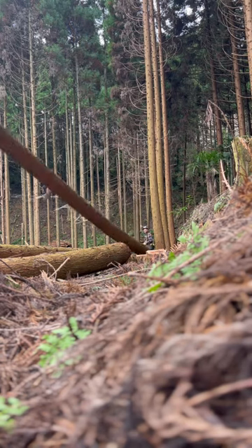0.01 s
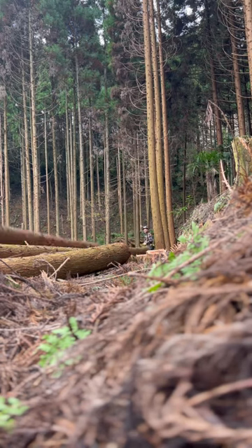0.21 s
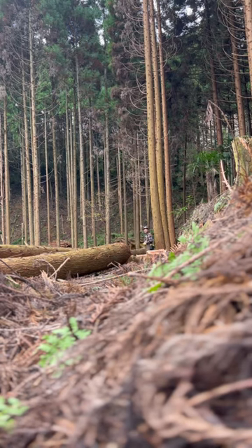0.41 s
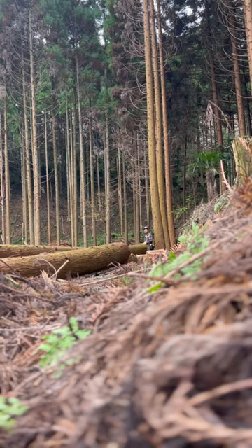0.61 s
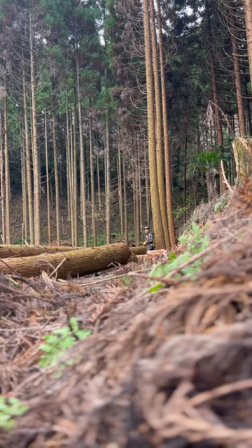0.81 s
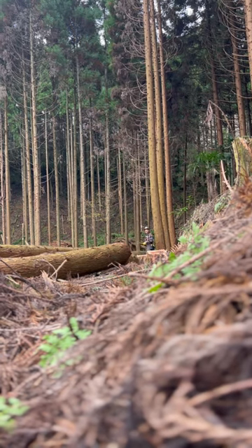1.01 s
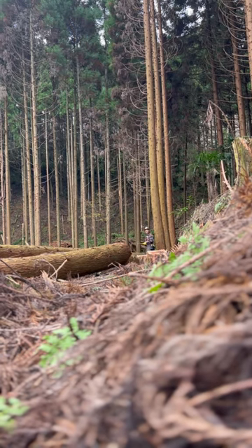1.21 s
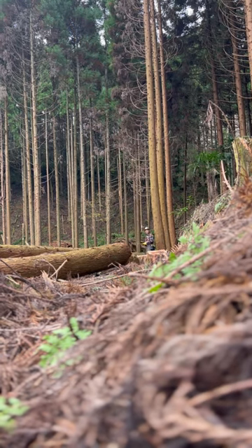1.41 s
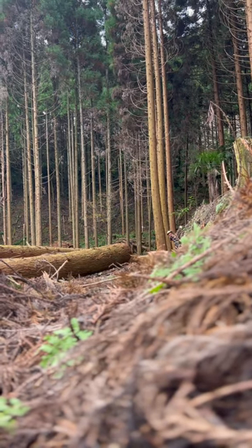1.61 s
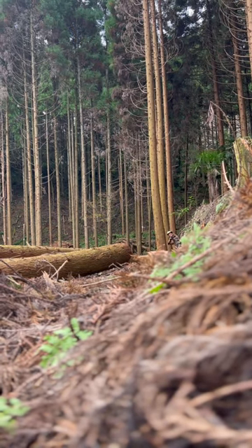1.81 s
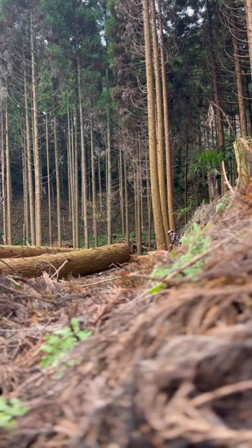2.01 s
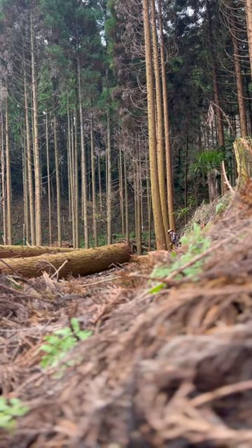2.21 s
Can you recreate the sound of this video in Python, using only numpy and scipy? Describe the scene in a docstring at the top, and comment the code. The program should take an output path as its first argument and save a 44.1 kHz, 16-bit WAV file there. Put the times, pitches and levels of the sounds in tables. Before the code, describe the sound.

Tree fall in a forest plantation: deep ground thump, crunching limbs, sharp snaps and needle hiss die away over an idling chainsaw and low engine drone; after a sudden cut, one woody knock rings near the end.

```python
"""A felled conifer slams into the forest floor: trunk thuds and ground rumble from rung modes and noise,
crunching limbs and snapping branches from resonated noise, hissing needles, crackling twigs, log knocks.
The scene changes abruptly to a quieter moment, where one hard blow on a felling wedge rings out as sagging
modes and the stand of trunks echoes it as noise. A chainsaw idles all along as filtered exhaust pulses,
over the low two-partial drone of a bigger engine and the noise of forest air."""
import sys
import numpy as np
from scipy import signal
from scipy.fft import rfft, irfft, next_fast_len
from scipy.io import wavfile
from scipy.ndimage import uniform_filter1d

SR = 44100
rng = np.random.default_rng(int(sys.argv[2]) if len(sys.argv) > 2 else 0)


def master(y):
    """Save y as 16-bit WAV."""
    cut = np.clip(np.atleast_2d(y).T, -1, 1)
    pcm = np.round(cut * 32767)  # scale
    wavfile.write(sys.argv[1], SR, pcm.astype(np.int16))


N = 101430


def amp(db):
    """Decibels to a linear gain."""
    return 10 ** (np.asarray(db) / 20)


def unit(x):
    """x brought to an rms of 1."""
    return x / np.sqrt(np.mean(x ** 2) + 1e-20)


def clock():
    """Time of each sample in seconds."""
    return np.arange(N) / SR


def along(points, hz):
    """Reads (Hz, value) points at the given frequencies on a log axis."""
    point_hz, values = np.transpose(points)
    return np.interp(np.log(hz + 1), np.log(point_hz + 1), values)


def curves(rows):
    """Automation lines: one value per sample for each column after the time."""
    times, *columns = np.transpose(rows)
    return [np.interp(clock(), times, column) for column in columns]


def fade(t, t60):
    """Exponential decay, down 60 dB after t60 seconds."""
    return np.exp(-np.log(1000) * t / t60)


def rise(t, rise_s):
    """Soft attack that approaches 1 exponentially."""
    return 1 - np.exp(-t / rise_s)


def filtered(x, response):
    """x times a response of frequency, padded against wrap-around."""
    size = next_fast_len(N + SR // 2)
    return irfft(rfft(x, size) * response(np.fft.rfftfreq(size, 1 / SR)), size)[..., :N]


def add(track, s, sound):
    """Mixes a short sound into the track at time s."""
    start = max(0, round(s * SR))
    part = track[..., start:start + sound.shape[-1]]
    part += sound[..., :part.shape[-1]]


def panned(pan_db):
    """Left and right gains; a positive pan leans left."""
    return amp(np.array([[pan_db], [-pan_db]]) / 2)


# left-right likeness of scattered sound: (frequency [Hz], coherence [0 to 1])
STEREO_LIKENESS = [(100, 1), (300, 0.99), (600, 0.48), (1500, 0.73), (4000, 0.53), (10000, 0.24)]


def spread(pair, colour):
    """Turns two unrelated signals into coloured stereo of rms 1, narrower where the ears hear alike."""
    def middle_and_side(hz):
        turn = np.arccos(np.clip(along(STEREO_LIKENESS, hz), -1, 1)) / 2
        return amp(along(colour, hz)) * [np.cos(turn), np.sin(turn)]

    mid, side = filtered(pair, middle_and_side)
    return unit(np.array([mid + side, mid - side]))


def noise(colour):
    """Coloured stereo noise of rms 1."""
    return spread(rng.standard_normal((2, N)), colour)


def steadied(x, window_s):
    """x with its slow swings of level evened out."""
    power = uniform_filter1d(np.mean(x ** 2, 0), max(2, int(window_s * SR)))
    return x / np.sqrt(np.abs(power) + 1e-4)


def ring(modes, t):
    """Sums damped sines from rows (Hz, dB, t60 s, rise s), each level varied at random by about 1 dB."""
    total = 0
    for hz, db, t60, rise_s in modes:
        gain = amp(db + rng.normal())
        total = total + gain * fade(t, t60) * rise(t, rise_s) * np.sin(2 * np.pi * hz * t)
    return total


# forest reverberation: (frequency [Hz], decay t60 [s])
FOREST_DECAY = [(100, 0.22), (500, 0.46), (2500, 0.13), (10000, 0.08)]


def forest(x, wet_db):
    """Adds scatter from trunks and ground: a noise tail whose decay depends on frequency."""
    hz, t, bins = signal.stft(rng.standard_normal((2, SR // 2)), SR, nperseg=256)
    decay = fade(t, along(FOREST_DECAY, hz)[:, None])
    tail = signal.istft(bins * decay, SR, nperseg=256)[1]
    scatter = signal.fftconvolve(x, tail / np.linalg.norm(tail[0]), axes=1)[:, :N]
    return x + amp(wet_db) * scatter


# trunk and heavy limbs hitting the ground: (time [s], level [dB], pitch [Hz])
THUD_HITS = [(.273, -0.5, 219), (.3, 2.5, 97.3), (.368, -2, 293), (.41, 1.5, 160), (0.426, 0.5, 215),
             (0.471, -10, 124), (.533, -11.5, 148), (0.713, -4.5, 79), (0.754, -13.5, 65),
             (0.833, -15.5, 65)]
THUD_T60_S = 0.057
# ground shaking under the trunk: (time [s], level [dB])
RUMBLE_LEVEL = [(.2, -41), (.262, -37), (.28, -7), (.315, -13), (.35, -12.5), (.38, -19), (.425, -10),
                (.445, -18), (.485, -18), (.51, -31), (.545, -28.5), (.6, -32), (.67, -35), (.72, -30),
                (.78, -28.5), (.86, -32.5), (.95, -40), (1.2, -74)]
# colour of the shaking ground: (frequency [Hz], relative level [dB per Hz])
RUMBLE_COLOUR = [(20, -36), (40, -8.5), (60, -6.5), (90, 3), (150, 1), (210, -8), (300, -11.5),
                 (600, -46.5), (1500, -86)]
# limbs crushed under the trunk: (time [s], level [dB])
CRUNCH_LEVEL = [(.15, -47.5), (.25, -26), (.278, -17), (.3, -12.5), (.325, -23.5), (.37, -13),
                (.432, -11.5), (.45, -22.5), (.485, -29.5), (.51, -44.5), (.545, -29), (.57, -44.5),
                (.66, -38.5), (.685, -35), (.8, -39), (1.25, -41.5), (1.5, -46)]
# colour of the crushed limbs: (frequency [Hz], relative level [dB per Hz])
CRUNCH_COLOUR = [(100, -32), (200, -4.5), (300, -0.5), (450, 0), (580, -9), (780, -14.5), (1000, -26.5),
                 (2000, -30.5), (5000, -77)]


def trunk(crunch_pan_db=2.0, crunch_lag_s=0.00028):
    """The trunk thuds and bounces as short damped tones, shakes the ground and crushes its limbs."""
    thuds, t = np.zeros(N), np.arange(SR // 4) / SR
    for s, db, hz in THUD_HITS:
        add(thuds, s, ring([(hz, db, THUD_T60_S, .002)], t))
    rumble = steadied(noise(RUMBLE_COLOUR), window_s=0.036) * amp(curves(RUMBLE_LEVEL)[0])
    crunch = steadied(noise(CRUNCH_COLOUR), window_s=0.034) * amp(curves(CRUNCH_LEVEL)[0])
    # the right ear hears the crunch a touch later
    crunch[1] = np.interp(clock() - crunch_lag_s, clock(), crunch[1])
    return thuds + rumble + crunch * panned(crunch_pan_db)


# breaking branches, before the trims below:
# (time [s], stick level [dB], pitch [Hz], splinter level [dB], decay t60 [s])
BRANCH_BREAKS = [(0.1677, -19, 2610, -27, 0.013), (0.191, -15.5, 1860, -22.5, .024),
                 (0.2064, -4.5, 3060, -33, 0.015), (0.21, -9.5, 6700, -24, .01),
                 (0.2483, -7, 2070, -21, .018), (0.2527, -18, 6000, -18, 0.015),
                 (0.2553, -2, 2180, -15.5, 0.011), (0.259, -7.5, 1900, -23, 0.023),
                 (0.2708, -4.5, 3150, -38, 0.023), (0.298, -14, 3150, -29, .02),
                 (0.3213, -10, 7600, -22, 0.015), (0.3476, -5.5, 1556, -20, 0.017),
                 (0.3749, -7, 3220, -32, .009), (0.4499, -0.5, 3930, -28, 0.011),
                 (0.4642, -9.5, 3240, -31, 0.012), (0.477, -12, 3000, -25.5, 0.0086),
                 (0.535, -16.5, 1575, -49, 0.035), (0.5651, -6, 3060, -31, 0.0084),
                 (0.6706, -20.5, 2220, -53, 0.017), (0.685, -22.5, 1690, -29, 0.024),
                 (0.9038, -9.5, 1820, -50, 0.026), (0.9894, -15, 4350, -30.5, 0.015),
                 (1.042, -24.5, 1710, -50, 0.04), (1.0796, -27.5, 1630, -47, .028),
                 (1.13, -27, 1500, -47, 0.035), (1.1895, -25.5, 1780, -60, 0.02),
                 (1.3087, -25.5, 3100, -45, 0.035), (1.3228, -8, 1930, -47, .008),
                 (1.346, -21, 1830, -41.5, .025), (1.471, -25, 1940, -39, 0.016)]
STICK_TRIM_DB, SPLINTER_TRIM_DB = -3.5, 4
OVERTONE_DB = -2.5  # against the stick's main pitch, at most
STICK_Q = 3.12  # at the typical decay


def stick_mode(tear, hz, q):
    """One resonance of the stick: tearing noise through two equal peaks, its level steadied."""
    peak = signal.iirpeak(min(hz, SR / 4), q, fs=SR)
    once = signal.lfilter(*peak, np.tile(tear, 2))
    twice = unit(signal.lfilter(*peak, once))
    # the first pass through the noise only gets the resonance going
    return steadied(twice[:, tear.shape[-1]:], window_s=0.0026)


def snaps(rise_s=0.00062, typical_t60_s=0.022, overtone=1.59, dull_hz=2600, pan_db=3, lag_s=.00015):
    """Each branch tears in a burst that rings the stick, with a bright splinter on top."""
    out, t = np.zeros((2, N)), np.arange(SR // 16) / SR
    bright = signal.butter(3, [5000, 9500], "band", fs=SR, output="sos")
    for s, db, hz, splinter_db, t60 in BRANCH_BREAKS:
        tear, chips = rng.standard_normal((2, 1, len(t)))
        q = max(1, STICK_Q * np.sqrt(t60 / typical_t60_s))  # the shorter the break, the broader its click
        overtone_gain = amp(OVERTONE_DB) * min(1, (dull_hz / hz) ** 2)  # weaker on high sticks
        stick = unit(stick_mode(tear, hz, q) + overtone_gain * stick_mode(tear, hz * overtone, q))
        body = amp(db + STICK_TRIM_DB) * stick * rise(t, rise_s)
        splinter = amp(splinter_db + SPLINTER_TRIM_DB) * unit(signal.sosfilt(bright, chips))
        left, right = (body * panned(pan_db) + splinter) * fade(t, t60)
        add(out[0], s, left)
        add(out[1], s + lag_s * rng.random(), right)
    return forest(out, wet_db=-10.5)


def crackle(per_s, pitch_hz, octaves, spread_db, cycles):
    """Stereo rain of tiny damped breaks, rms 1, each from its own direction."""
    count = int(per_s * N / SR)
    when, size, side, lag, tone = rng.random((count, 5)).T
    scatter = np.log((tone + 1e-9) / (1 - tone)) / 2  # bell-shaped, so most breaks sit near the pitch
    hz = np.clip(pitch_hz * 2 ** (octaves * scatter), 600, 13000)[:, None]
    t = np.arange(SR // 100) / SR
    # many small breaks, few big ones; the root offsets the shorter ring of high ones
    gain = amp(-spread_db * np.log(size + 0.022))[:, None] * np.sqrt(hz)
    grains = gain * np.sin(2 * np.pi * hz * t) * fade(t, cycles / hz)
    at = (when * N).astype(int)[:, None] + np.arange(len(t))
    at_right = at + (lag * 20).astype(int)[:, None]  # up to 19 samples later
    ears = []
    for places, share in [(at, side), (at_right, 1 - side)]:
        weighted = grains * np.sqrt(share)[:, None]
        ears.append(np.bincount(places.ravel(), weighted.ravel(), N)[:N])
    return unit(np.array(ears))


# crown brushing through air and brush: (time [s], level [dB])
SWISH_LEVEL = [(0, -41.5), (.16, -39), (.225, -31), (.243, -34), (.254, -19.5), (.268, -29), (.3, -21.5),
               (.355, -23.5), (.385, -27), (.44, -31), (.52, -38), (.6, -42.5), (.69, -39.5), (.88, -41),
               (1.05, -46), (1.27, -48), (1.33, -41), (1.39, -46.5), (1.5, -41)]
# hiss of the needles: (frequency [Hz], relative level [dB per Hz])
NEEDLE_COLOUR = [(200, -53), (600, 4.5), (1000, -7), (1800, -5.5), (3200, 1), (4800, -5.5), (7500, -2),
                 (10000, -9), (12500, -13.5), (16000, -31)]
NEEDLE_DB = 1
# small twigs, then thicker sticks: (rate [breaks per s], pitch [Hz], pitch spread [octaves],
# size spread [dB], ring [cycles], level [dB])
TWIGS_AND_STICKS = [(905, 4460, 0.59, 5.5, 4.1, -4), (264, 1980, 0.62, 4, 15, -5)]
DULL_FROM_S, DULL_DB_PER_S = 0.25, 13.5  # the treble fades as the crown comes to rest


def crown(treble_hz=6000, pan_db=4.0):
    """Needles hiss as noise, twigs and sticks crackle as grains, duller as they come to rest."""
    rustle = amp(NEEDLE_DB) * noise(NEEDLE_COLOUR)
    for *kind, db in TWIGS_AND_STICKS:
        rustle = rustle + amp(db) * crackle(*kind)
    treble = filtered(rustle, lambda hz: hz ** 2 / (hz ** 2 + treble_hz ** 2))
    dulling = amp(-DULL_DB_PER_S * np.maximum(clock() - DULL_FROM_S, 0))
    rustle = (rustle - treble) * panned(pan_db) + treble * dulling
    return rustle * amp(curves(SWISH_LEVEL)[0])


# logs knocking together as they settle: (time [s], level [dB])
LOG_KNOCKS = [(.672, -29), (1.221, -34.5), (1.322, -24.5), (1.343, -20), (1.372, -29)]
# modes of the log: (frequency [Hz], level [dB], decay t60 [s])
LOG_MODES = [(336, -8, 0.081), (453.4, -0.5, 0.17), (482, -4.5, 0.12), (543, -10.5, .07),
             (640, -11.5, 0.051), (770, -21, 0.025)]


def knocks(pan_db=2):
    """The log rolls against its neighbour with a hollow clunk of damped modes."""
    out, t = np.zeros((2, N)), np.arange(SR // 4) / SR
    for s, db in LOG_KNOCKS:
        clunk = ring([(*mode, .001) for mode in LOG_MODES], t)
        add(out, s, amp(db) * clunk * panned(pan_db))
    return forest(out, wet_db=-16.5)


BLOW_S, MODES_DB = 1.986, -17  # moment of the blow; trim of the modes below
# modes of wedge and stem, before the trim: (frequency [Hz], level [dB], decay t60 [s], delay [s])
WEDGE_MODES = [(80.8, -1.5, 0.25, 0.022), (132, -2.5, 0.12, 0.0061), (330, -6, 0.063, 0.0047),
               (383, -7, 0.079, .04), (450, -13, 0.09, .024), (626, -7, 0.098, 0.00593),
               (1230, -1, 0.045, 0.014), (1392, -5, 0.066, 0.00302), (1780, 2, 0.037, 0.00206),
               (2230, -9.5, 0.046, 0.002), (4900, -17, 0.027, 0.00102)]
# each mode starts sharp (as a fraction of its pitch) and sags to its pitch
WEDGE_RISE_S, WEDGE_SHARP, WEDGE_SETTLE_S = 0.0036, 0.064, 0.013
# crack of the blow: (frequency [Hz], relative level [dB per Hz])
CRACK_COLOUR = [(300, -15), (1500, 5.5), (4000, 2.5), (7200, -1.5), (9000, -26), (11500, -25),
                (13000, -64.5)]
CRACK_DB, CRACK_T60_S = -17, 0.035
# woody body of the blow: (frequency [Hz], relative level [dB per Hz])
STEM_COLOUR = [(250, 3.5), (650, -1.5), (900, -5.5), (1300, 12), (1800, 0), (2300, -16), (4000, -49.5)]
STEM_DB, STEM_T60_S = -19, 0.096
# echo from the stand of trunks: (time after the blow [s], level [dB])
ECHO_LEVEL = [(0, -65), (.012, -36), (.04, -43.5), (.075, -37), (.115, -37), (.16, -41.5), (.22, -51),
              (.31, -49.5)]
# colour of the echo: (frequency [Hz], relative level [dB per Hz])
ECHO_TONE = [(300, -11), (650, -3.5), (950, -11.5), (1400, -1.5), (2400, 0.5), (3600, -8), (6300, -10.5),
             (8500, -22.5), (13000, -49)]


def wedge(pan_db=2, crack_rise_s=0.0017, stem_rise_s=0.0049):
    """A crack, the sagging ring of wedge and stem, each mode after its own delay, and the trees' echo."""
    out, modes, t = np.zeros((2, N)), np.zeros(N), clock()
    # time runs fast at first, which lifts the pitch
    sagging = t + WEDGE_SHARP * WEDGE_SETTLE_S * rise(t, WEDGE_SETTLE_S)
    for hz, db, t60, delay_s in WEDGE_MODES:
        add(modes, delay_s, ring([(hz, db + MODES_DB, t60, WEDGE_RISE_S)], sagging))
    crack = amp(CRACK_DB) * noise(CRACK_COLOUR) * fade(t, CRACK_T60_S) * rise(t, crack_rise_s)
    wood = amp(STEM_DB) * steadied(noise(STEM_COLOUR), window_s=0.0062)
    wood = wood * fade(t, STEM_T60_S) * rise(t, stem_rise_s)
    echo = noise(ECHO_TONE) * amp(curves(ECHO_LEVEL)[0])
    add(out, BLOW_S, (modes + crack + wood) * panned(pan_db) + echo)
    return out


# chainsaw idle: (time [s], rate [strokes per s])
SAW_STROKES = [(0, 44.6), (1.5, 42.8), (1.62, 40.6), (1.95, 41.2), (2.3, 39.6)]
# chainsaw loudness: (time [s], level [dB])
SAW_LOUDNESS = [(0, -33.5), (.9, -33.5), (1.49, -33.5), (1.52, -41.5), (2.3, -42)]
# colour of the exhaust note: (frequency [Hz], relative level [dB])
EXHAUST_COLOUR = [(50, -9.5), (90, -2), (125, -2), (170, 3.5), (230, -2), (310, -5.5), (420, -11.5),
                  (530, -20), (680, -60), (1000, -40.5), (3000, -43), (9000, -69.5)]
# the stronger firings of the idle: (time [s])
STRONG_FIRINGS = [.065, 0.167, 1.22, 1.488, 1.604, 1.725, 1.825, 1.923, 2.24]
POP_HZ, POP_T60_S, POP_DB = 116, 0.06, 6.5  # level against the steadied exhaust
MUFFLER_T60_S = 0.053  # each stroke rings on in muffler and ground


def chainsaw(jitter_s=0.00068, scatter_db=1.5, puff_t60_s=0.088, puff_db=0):
    """One exhaust pulse and a puff of gas per stroke; at the listed times a stronger firing pops."""
    turns = np.cumsum(curves(SAW_STROKES)[0]) / SR
    strokes = np.flatnonzero(np.diff(np.floor(turns))) / SR
    t = np.arange(SR // 10) / SR
    pulses, gate, pops = np.zeros((3, N))
    for s, (late, size) in zip(strokes, rng.standard_normal((len(strokes), 2))):
        s, gain = s + jitter_s * late, amp(scatter_db * size)
        add(pulses, s, np.array([gain]))
        add(gate, s, gain * fade(t, puff_t60_s))
    for s in STRONG_FIRINGS:
        add(pops, s, ring([(POP_HZ, POP_DB, POP_T60_S, .002)], t))
    spectrum = rfft(rng.standard_normal(len(t)) * fade(t, MUFFLER_T60_S))
    muffler = irfft(spectrum / np.abs(spectrum), len(t))  # smears each stroke without colouring it
    smeared = signal.fftconvolve(pulses, muffler)[:N]
    note = unit(filtered(smeared, lambda hz: amp(along(EXHAUST_COLOUR, hz))))
    puffs = spread(gate * rng.standard_normal((2, N)), EXHAUST_COLOUR)
    exhaust = steadied(note + amp(puff_db) * puffs, window_s=.05)
    return amp(curves(SAW_LOUDNESS)[0]) * unit(exhaust + pops)


# engine drone: (time [s], pitch [Hz], level [dB])
DRONE_GLIDE = [(0, 55.8, -29.5), (.25, 57.15, -34), (.95, 63.54, -36.5), (1.49, 64.9, -38),
               (1.51, 45.56, -40), (2.3, 45.3, -39)]


def drone(second_db=-12):
    """The firing note of a bigger engine further off: a gliding sine and its octave."""
    hz, db = curves(DRONE_GLIDE)
    phase = 2 * np.pi * np.cumsum(hz) / SR
    partials = np.sin(phase) + amp(second_db) * np.sin(2 * phase)
    return np.sqrt(2) * amp(db) * partials


# forest air: (frequency [Hz], relative level [dB per Hz])
AIR_COLOUR = [(30, 14), (300, 15.5), (700, -1.5), (1100, -5.5), (2500, 0.5), (4200, -3.5), (6300, -1),
              (8000, -11), (10000, -22), (13000, -36)]


def air(level_db=-54):
    """Steady coloured noise of the open forest."""
    return amp(level_db) * noise(AIR_COLOUR)


CUT_S = 1.503  # the abrupt change of scene


def scene():
    """The fall stops dead at the change of scene; engines and air go on."""
    gate = np.clip((CUT_S - clock()) / 0.0016, 0, 1)
    fall = (trunk() + snaps() + crown() + knocks()) * gate
    return fall + wedge() + chainsaw() + drone() + air()


def record(dry, ceiling=0.85, low_cut_hz=33, top_hz=16200):
    """Deep bass is cut, peaks are rounded off; nothing is kept above the band limit."""
    low_cut = signal.butter(4, low_cut_hz, "high", fs=SR, output="sos")
    dry = signal.sosfilt(low_cut, dry)
    rounded = dry / (1 + np.abs(dry / ceiling) ** 6) ** (1 / 6)
    return filtered(rounded, lambda hz: hz < top_hz)


dry = scene()
out = record(dry)
master(out)
```